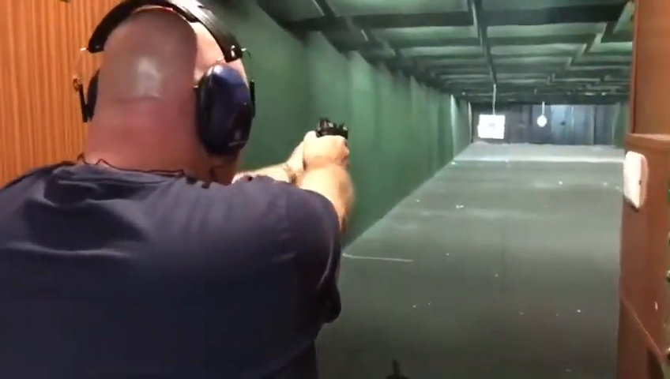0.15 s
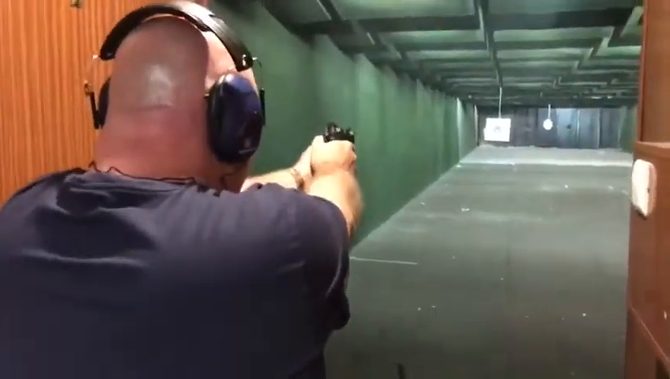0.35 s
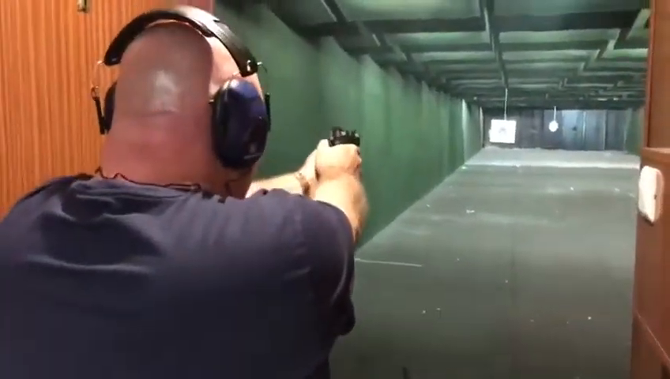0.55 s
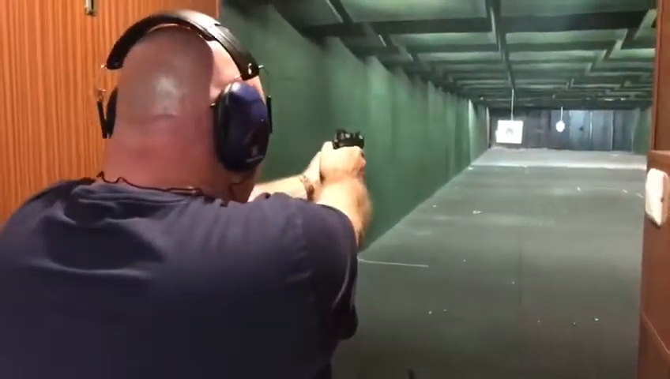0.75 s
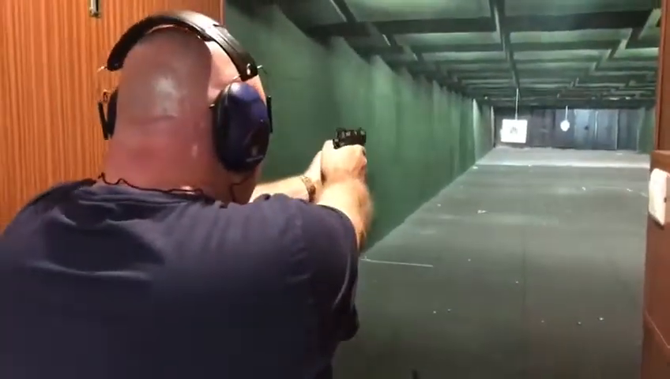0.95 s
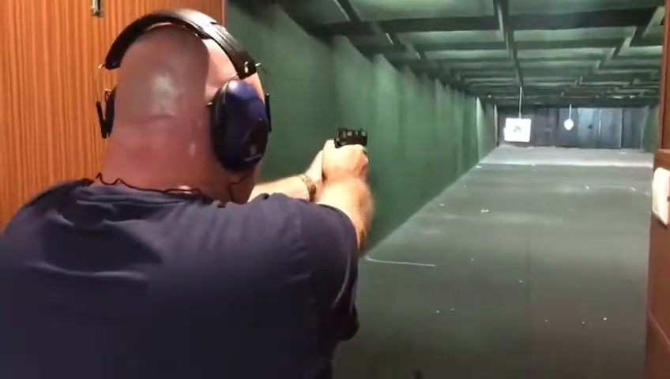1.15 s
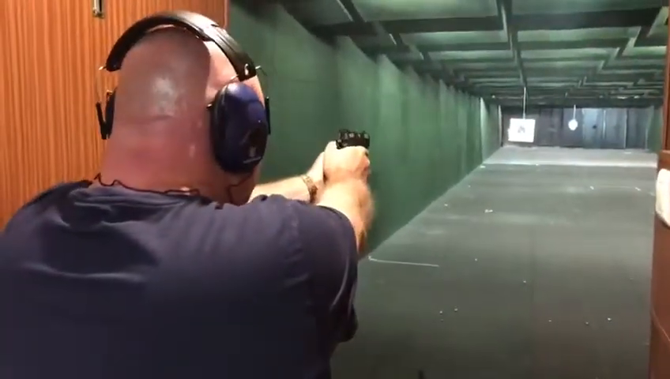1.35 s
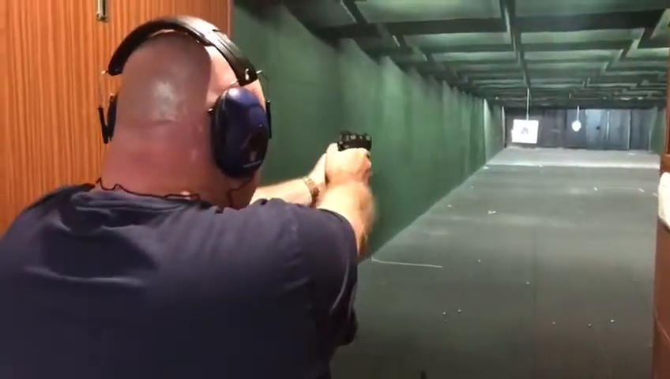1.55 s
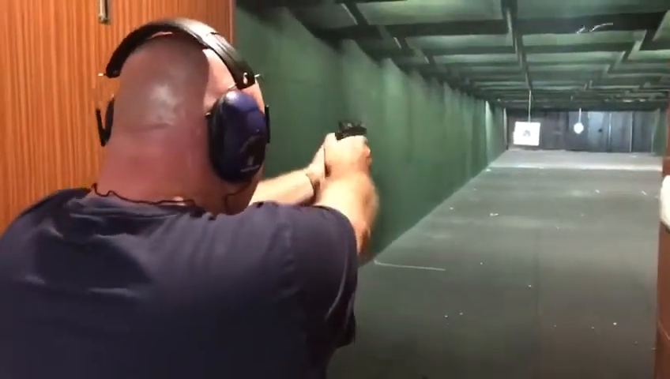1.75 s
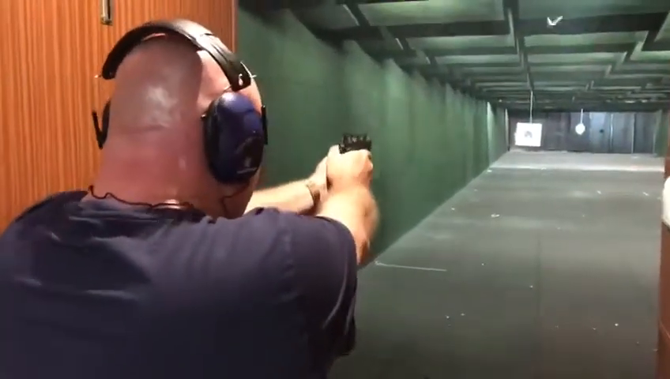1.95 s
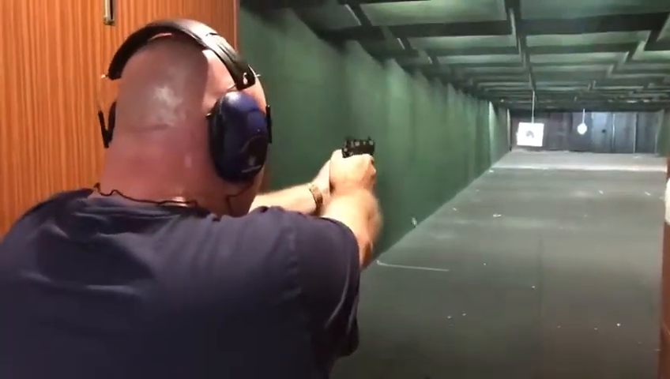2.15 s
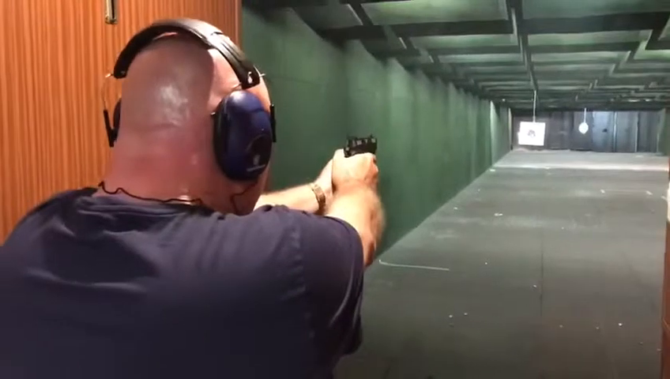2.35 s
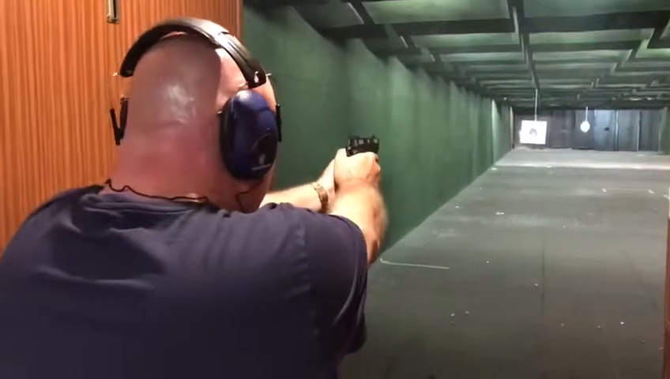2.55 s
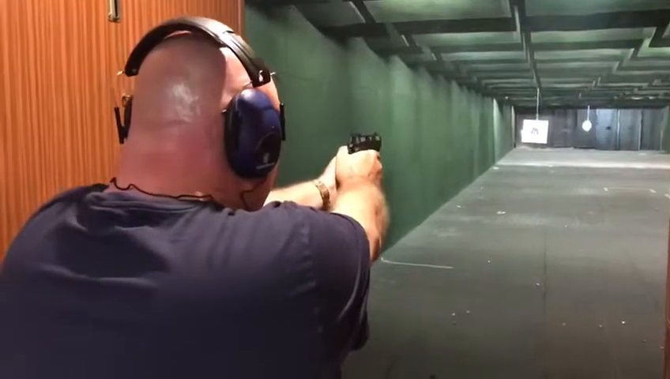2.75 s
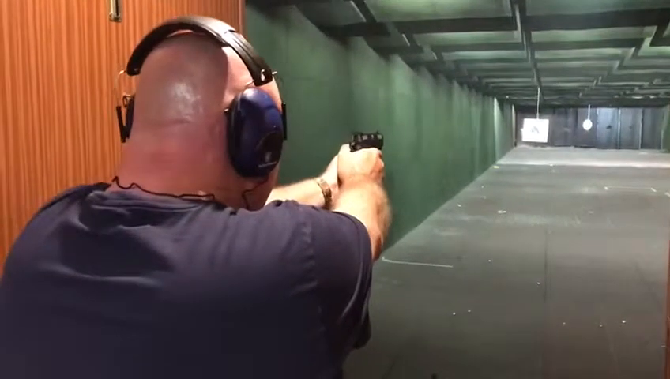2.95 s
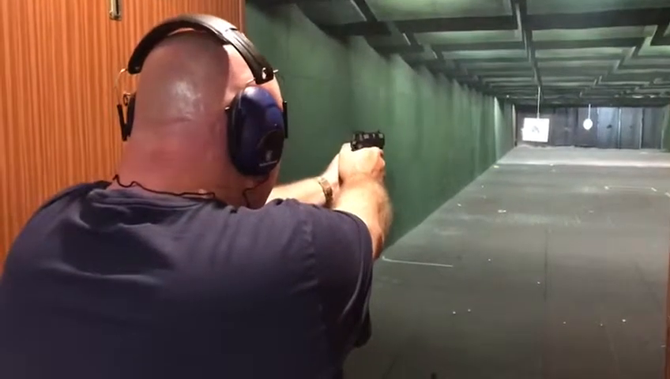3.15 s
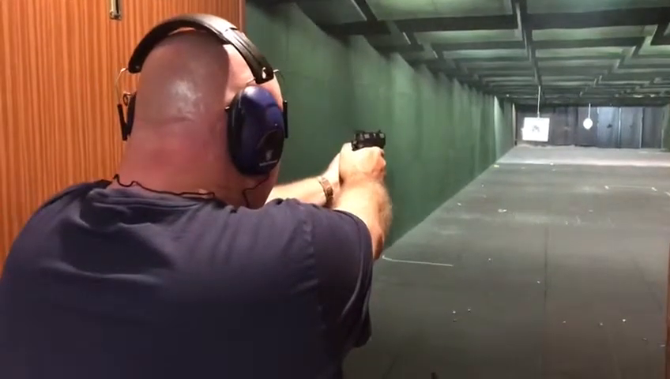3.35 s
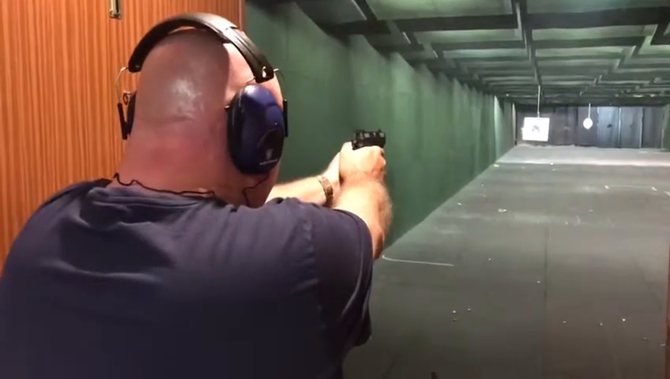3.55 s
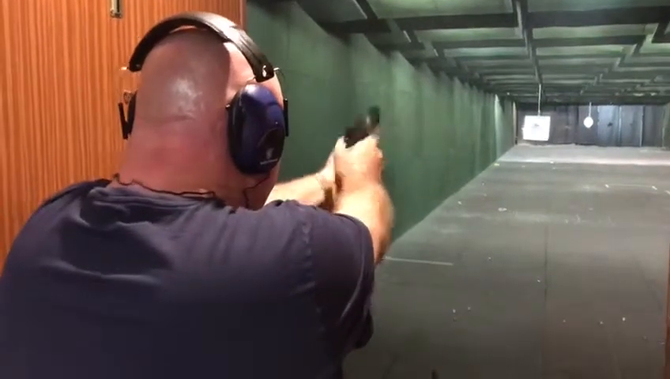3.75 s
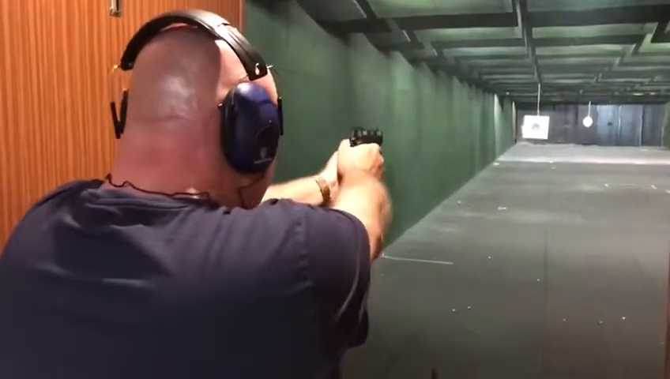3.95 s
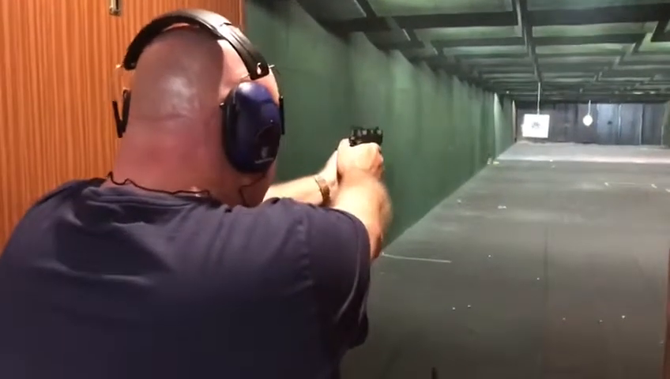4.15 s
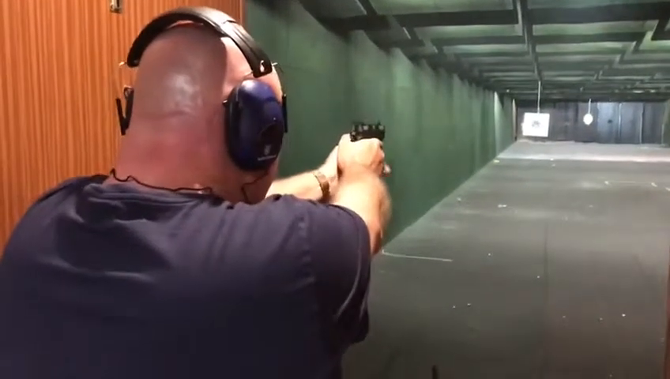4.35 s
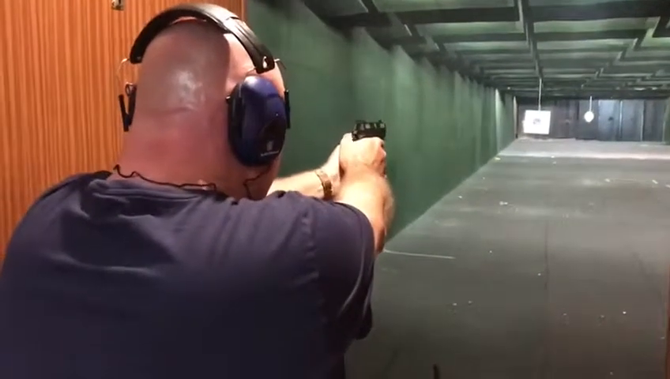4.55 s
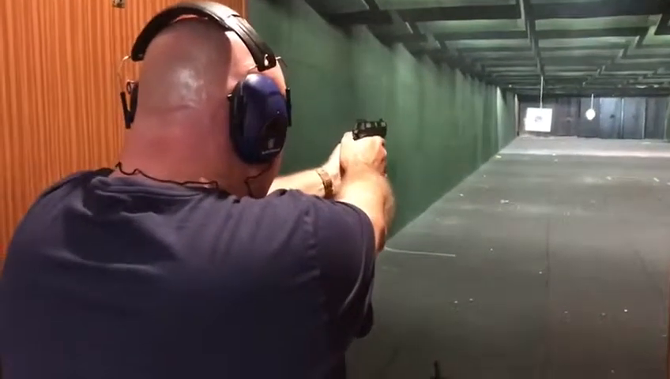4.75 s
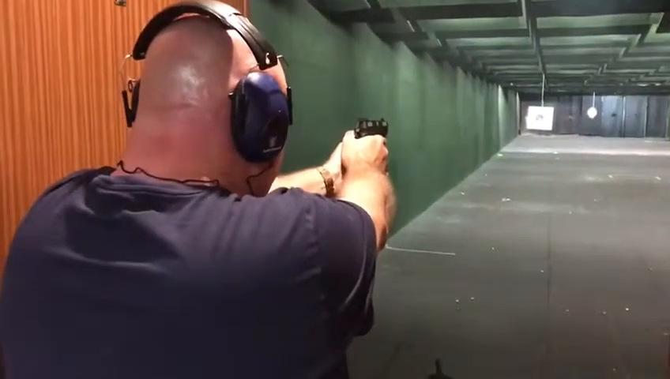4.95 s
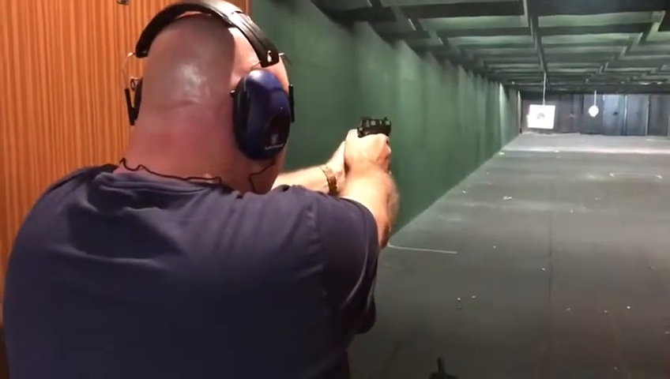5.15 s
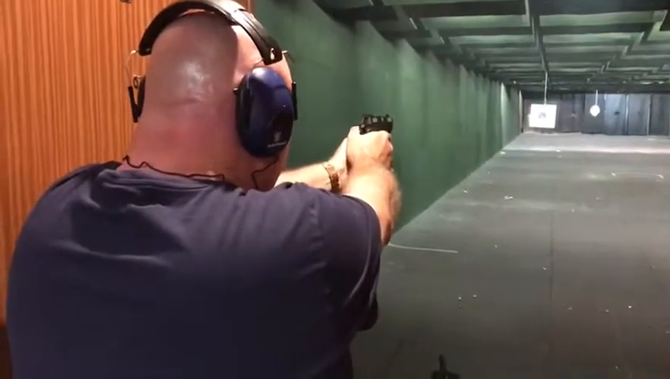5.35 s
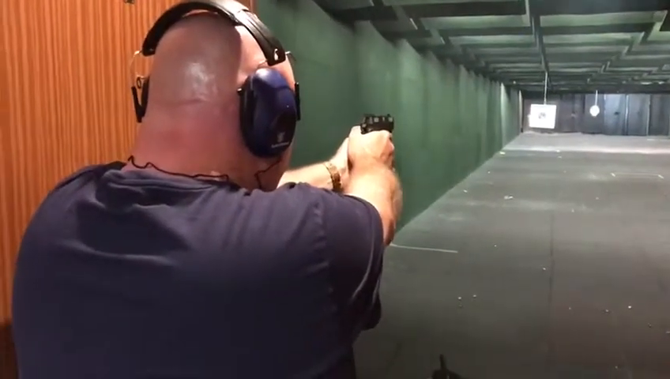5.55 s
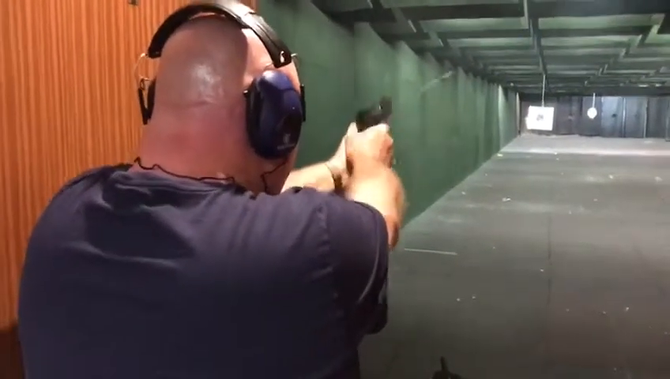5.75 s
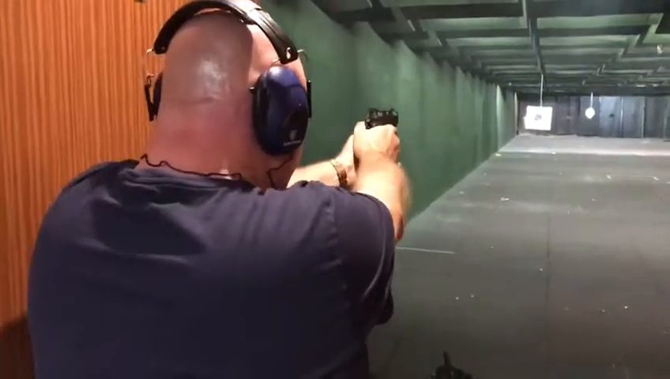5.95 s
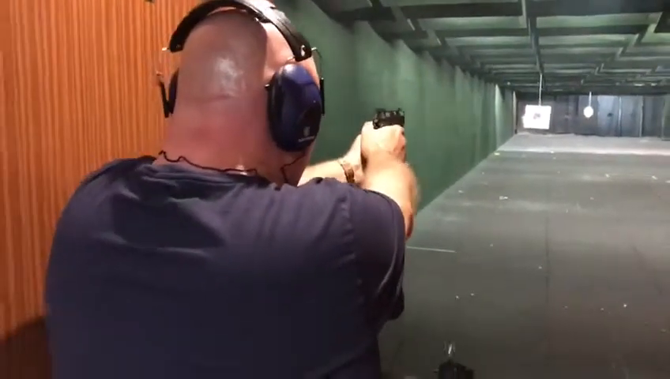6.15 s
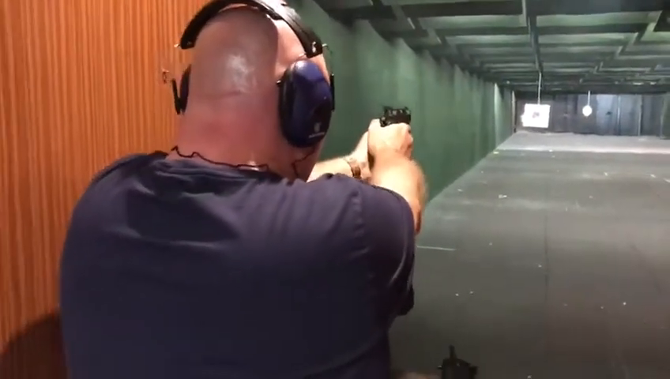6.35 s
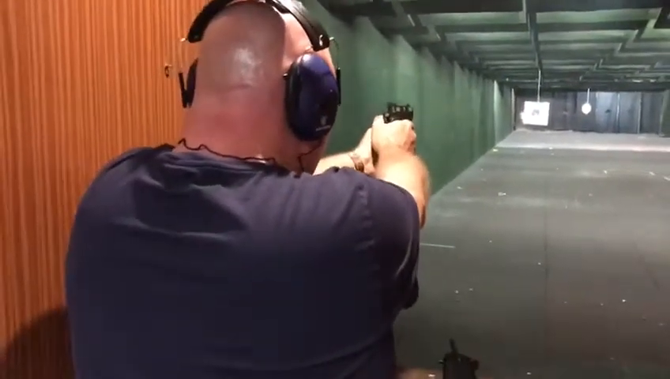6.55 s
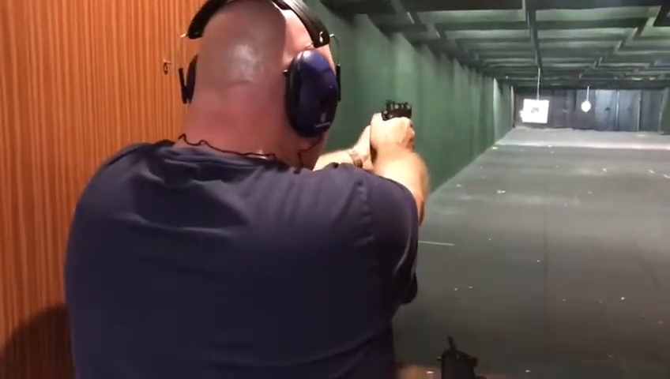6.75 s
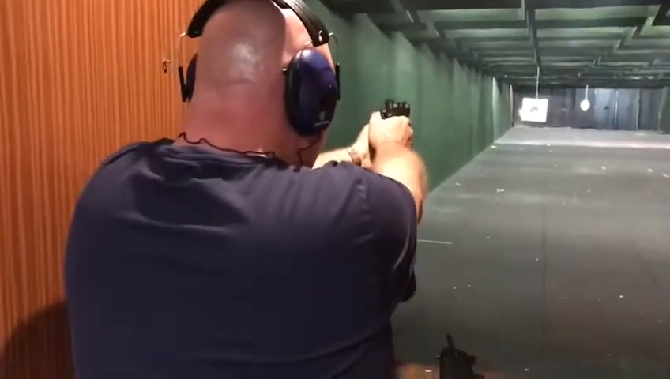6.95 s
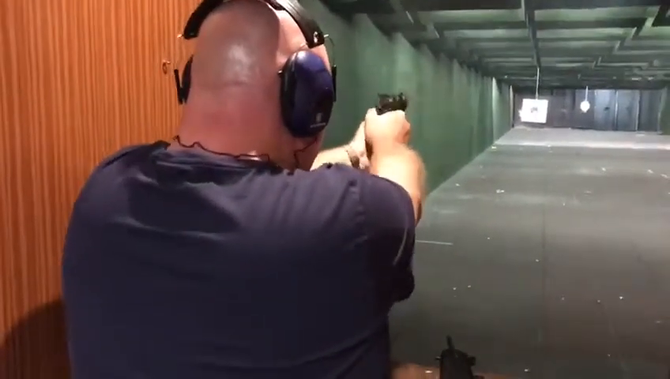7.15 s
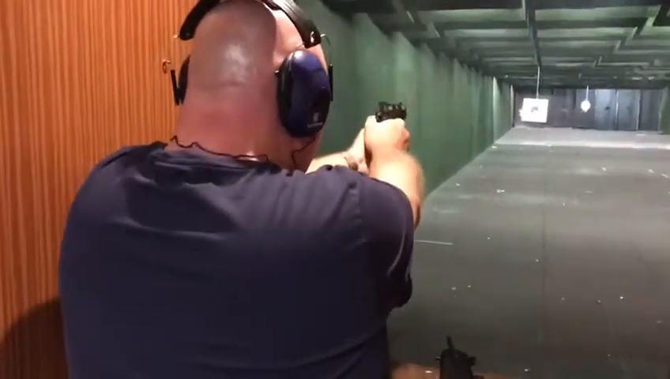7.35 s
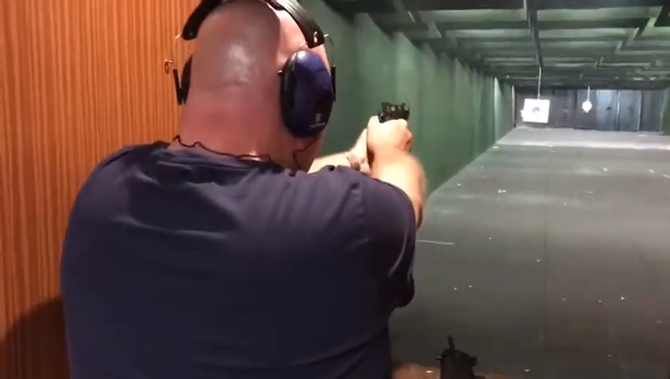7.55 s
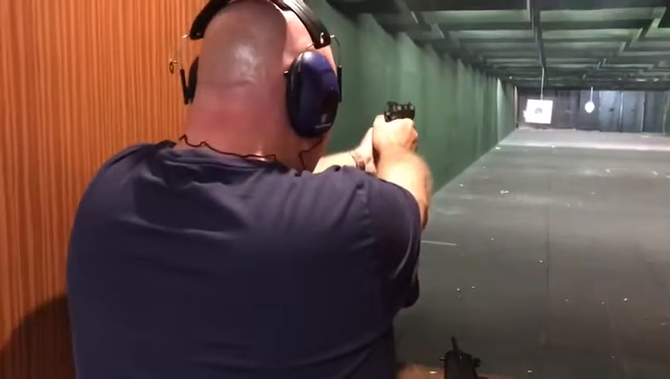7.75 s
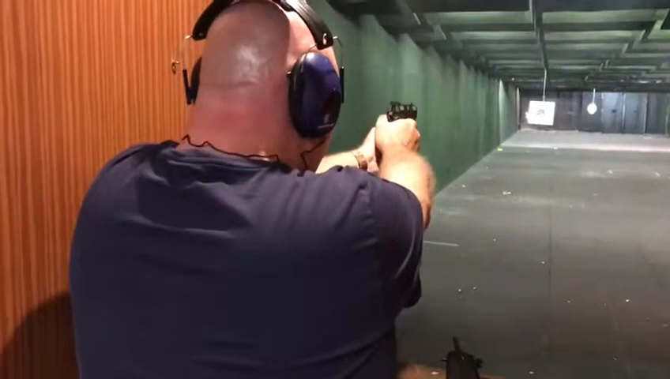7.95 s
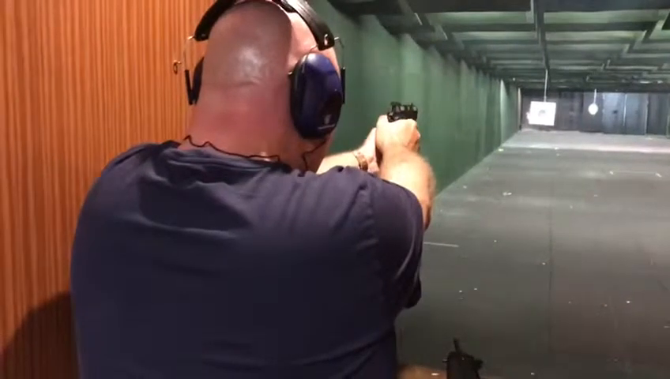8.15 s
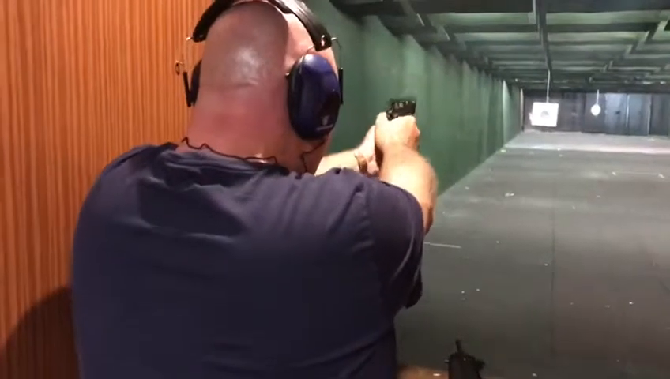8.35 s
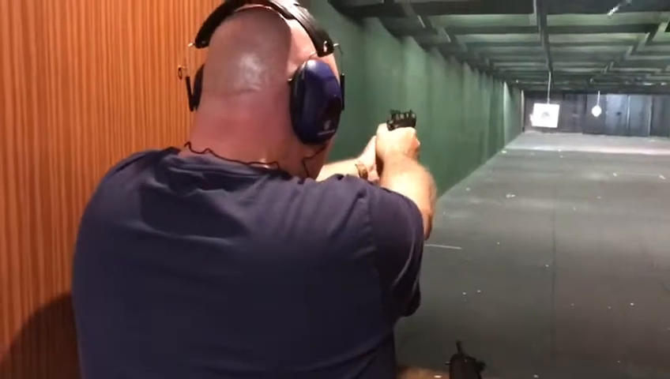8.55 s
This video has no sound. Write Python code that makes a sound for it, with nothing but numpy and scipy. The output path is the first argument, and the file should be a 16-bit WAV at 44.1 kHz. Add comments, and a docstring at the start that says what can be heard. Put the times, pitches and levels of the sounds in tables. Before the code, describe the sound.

Faint ventilation hiss and low duct rumble, with barely audible fan tones, run throughout in a long indoor shooting range. After slight cloth rustles, a pistol fires close by at about 1.6 seconds, then again at 3.7, 5.7, 7.1 and 8.3 seconds. Each shot is a very loud, brief roar that overloads the small microphone and dies quickly in the booth; a softer wash returns from the far end and fades over about a second. Between shots, spent cases and hard parts make much quieter clacks, dull thuds and thin, high brass pings. One stands out at 2.5 seconds, a small bouncing cluster comes around 4.5, and the sharpest clack lands at 5.2. More follow near 6.0, 6.6, 7.3, 7.9, 8.2 and 8.5 seconds. Soft rustles of clothing and grip appear now and then. The last echo is still fading at the end.

```python
"""A pistol fires five shots from a booth in a long indoor range; the blasts overload a small microphone.
The booth roars and dies fast, then the far end of the hall throws each blast back as a slow wash.
Spent cases and hard parts clack and ring on the surfaces they strike; cloth and grip rustle.
Behind them the ventilation hisses, its ducts rumble and a distant fan adds faint tones."""
import sys
import numpy as np
from scipy import signal
from scipy.fft import rfft, irfft
from scipy.io import wavfile
from scipy.ndimage import uniform_filter1d

SR = 44100
rng = np.random.default_rng(int(sys.argv[2]) if len(sys.argv) > 2 else 0)


def store_pcm(level_fs):
    """Save levels as 16-bit WAV."""
    pcm = np.round(np.clip(level_fs, -1, 1) * 32767).astype(np.int16)
    wavfile.write(sys.argv[1], SR, np.atleast_2d(pcm).T)


N = 379701

# shots: (time [s], bass [dB], booth ring [dB], thump [dB], roar hold [s], treble lag [s], steel [dB])
SHOTS = [(1.6433, -6.5, -9, -14, 0.092, 0.009, -51), (3.7449, -1, -11, -4.5, 0.091, 0.0063, -50),
         (5.7478, 0, -16, -2.5, 0.08, 0.00029, -58), (7.0762, -1, -9.5, -10, 0.088, 0.00027, -37),
         (8.2639, -1, -10, -14, 0.09, 0.00013, -49)]
# blast bands: (frequency [Hz], booth level [dB], booth t60 [s], hall level [dB], hall t60 [s])
BLAST_BANDS = [(53, -6.5, 0.34, -58, 0.5), (111, -15.5, 0.18, 2.5, 1.63), (259, -4.5, 0.29, -0.5, 1.05),
               (443, -15, 0.51, -8, 1.18), (715, -7.5, 0.33, -2, 1.1), (1230, -7.5, 0.42, -2.5, 0.95),
               (1884, -14, 0.28, -8, 0.95), (2840, -9, 0.33, -5.5, 0.75), (4230, -9.5, 0.28, -7, 0.58),
               (6780, -14.5, 0.25, -14.5, 0.44), (8250, -13, 0.22, -10.5, 0.31),
               (11930, -14.5, 0.096, -38, 0.073)]
# booth resonances: (frequency [Hz], width [Hz], level [dB])
BOOTH_MODES = [(290, 31, -8), (325, 25, -4), (388, 20, -13.5), (533, 80, -2.5), (657, 120, -2.5),
               (934, 51, -9.5), (980, 30, -10.5), (1290, 17, -1)]
# steel baffle plates: (frequency [Hz], level [dB], t60 [s])
BAFFLE_MODES = [(4165, -7, 1.1), (4178, -12, .9)]
# impacts of cases and hard parts:
# (time [s], clack [dB], thud [dB], tilt [dB/octave], brass [dB], surface pitch [ratio], panel ring [dB])
KNOCKS = [(1.8594, -42.5, -47, 4.5, -64, 1.15, -12), (2.4932, -30.5, -46, 0.5, -40, 1.05, 2.5),
          (3.0808, -53, -30, -6, -77.5, 0.98, -0.5), (3.5341, -64, -39.5, -3.5, -81, 0.73, -5.5),
          (3.9841, -43, -45, 5, -57, 0.92, -3), (4.4336, -33.5, -61, -1.5, -47, 1.27, -0.5),
          (4.4914, -49, -63, 1.5, -67, 1.17, -11), (4.5064, -54, -62, 3, -45.5, 1.2, -10),
          (4.5967, -65, -51, -4, -48.5, 1.01, -3), (4.655, -64, -54, -3, -59, 0.72, -8),
          (4.8375, -84, -56, 11, -46, 0.94, -7.5), (5.0468, -46.5, -32, -6, -58, 0.61, -8),
          (5.2151, -22.5, -30.5, 0.5, -48, 0.85, -5), (5.4154, -54.5, -38, -10.5, -86.5, 0.5, -4),
          (5.5664, -55.5, -40, -1.5, -60, 0.5, -2.5), (5.9763, -43, -48, 1.5, -46, 0.97, 7),
          (6.6114, -32, -51.5, -3.5, -43.5, 1.13, -13), (7.2955, -38, -30, 4, -40, 0.86, 7.5),
          (7.8892, -31.5, -39, 1.5, -61, 1.1, -3), (8.1636, -51.5, -51, 4.5, -58, 1.7, -6),
          (8.2005, -30, -32.5, 0.5, -48, 0.53, -12), (8.4941, -30.5, -27.5, 0.5, -47, 1, 0)]
# hard clack: (frequency [Hz], level [dB])
CLACK_SPECTRUM = [(280, -29.5), (650, -8.5), (1500, 0.5), (3300, -0.5), (5200, -9), (7500, -19.5),
                  (10500, -20)]
# dull thud at surface pitch 1: (frequency [Hz], level [dB])
THUD_SPECTRUM = [(200, -5.5), (400, -3.5), (650, 1), (900, -3.5), (1300, -21), (3300, -32), (10500, -50.5)]
# clatter decay of a pure clack: (frequency [Hz], t60 [s])
CLATTER_DECAY = [(200, 0.26), (800, 0.18), (2500, 0.13), (6000, 0.12), (11000, 0.17)]
# room tail of a knock: (frequency [Hz], t60 [s])
ROOM_DECAY = [(200, 0.56), (1000, 0.66), (3000, 0.4), (6000, 0.55), (11000, 0.44)]
# struck panel at surface pitch 1: (frequency [Hz], level [dB], t60 [s])
PANEL_MODES = [(600, -2, .2), (790, -2, .15), (1070, -3, .1), (1370, -2, .3), (1570, -2, .3),
               (1700, -4, .25), (2170, 0, .2), (2680, -2, .2), (2945, -1, .25), (3290, -3, .18),
               (3680, -3, .15), (4310, -3, .18)]
# rustles of cloth and grip: (time [s], level [dB], t60 [s])
RUSTLES = [(.03, -60, 0.16), (1.11, -63, 0.22), (1.195, -59.5, 0.47), (1.465, -59.5, 0.46), (1.56, -54, 1),
           (2.85, -61.5, 0.22), (3.295, -58, 0.37), (3.69, -55.5, 0.33), (5.0, -69.5, 0.13),
           (5.47, -61, 0.32), (5.54, -55.5, 0.14), (6.5, -61, 0.16), (6.97, -59, 0.075)]
# cloth friction: (frequency [Hz], level [dB])
CLOTH_SPECTRUM = [(300, -36.5), (1000, 0.5), (2500, 0.5), (4500, -1), (8000, -13), (12000, -11)]
# ventilation noise: (frequency [Hz], relative density [dB])
AIR_SPECTRUM = [(12, -52), (20, -22), (92, 0), (111, -3), (124, -22), (167, -21), (218, -23.5), (438, -34),
                (544, -39.5), (692, -38.5), (858, -43.5), (1680, -54), (2200, -53), (2870, -58.5),
                (12200, -71), (15900, -94), (22000, -120)]
# duct resonances: (frequency [Hz], width [Hz], level [dB])
DUCT_MODES = [(64.7, 32, -7), (97, 40, -0.5), (115, 70, 1.5)]
# slow course of the duct rumble: (time [s], level [dB])
RUMBLE_LEVELS = [(0.0, -40), (0.6, -39), (0.84, -47), (1.598, -41), (3.548, -44.5), (4.599, -36),
                 (5.15, -36.5), (5.4, -41.5), (6.598, -38.5), (8.61, -37)]
# fan tones: (frequency [Hz], rms level [dB])
FAN_TONES = [(699.8, -75), (1647, -78.5), (2056, -84.5), (2880, -85), (3704, -91)]

BLAST_GAIN_DB, FRONT_HZ, THUMP_HZ = -7, 505, 63
TREBLE_FADE_DB_PER_S, FADE_CORNER_HZ = 73, 1900
COLLAPSE_DB, COLLAPSE_S = 3, 0.033
RETURN_DELAY_S, RETURN_RISE_S, RETURN_GAIN_DB = 0.22, 0.063, -24.5
BRASS_HZ, BRASS_SPLIT_HZ, BRASS_T60_S = 10950, 25, 0.29
AIR_RMS_DB = -52
DIP_DB, DIP_S = 15, 0.17
SURGE_DB, SURGE_DELAY_S, SURGE_WIDTH_S = -30, 0.503, 0.056
LOW_CUT_HZ, HIGH_CUT_HZ = 38, 12150


def shot(bass_db, ring_db, thump_db, hold_s, lag_s, steel_db):
    """Muzzle blast and its dense reflections: first the booth, then the length of the hall."""
    t = np.arange(1 << 16) / SR
    hz, booth_db, booth_t60_s, hall_db, hall_t60_s = np.transpose(BLAST_BANDS)[:, :, None]
    # the pressure step bounces between the partitions as a short low knock
    front = amp(BLAST_GAIN_DB + 0.5) * swell(t, 0.00016, 0.015) * np.sin(2 * np.pi * FRONT_HZ * t)
    rise_s = np.clip(10 / hz, 0.003, 0.028)  # ten cycles, within limits
    fade_db = TREBLE_FADE_DB_PER_S / (1 + (FADE_CORNER_HZ / hz) ** 2.1) * np.minimum(t, hold_s)
    booth = roar(t - lag_s * (hz > 4000), rise_s, hold_s, booth_t60_s)
    booth *= amp(BLAST_GAIN_DB + booth_db - fade_db)
    hall = amp(RETURN_GAIN_DB + hall_db) * swell(t - RETURN_DELAY_S, RETURN_RISE_S, hall_t60_s)
    bass_gain = amp(bass_db * np.clip(np.log2(400 / hz), 0, 1))
    wash = (bass_gain * np.hypot(booth, hall) * noise_bands(hz[:, 0], len(t))).sum(0)
    booth_response = resonances(BOOTH_MODES, np.fft.rfftfreq(len(t), 1 / SR))
    ring = shaped_noise(booth_response, len(t)) * roar(t, 0.028, hold_s, 0.28)
    # lowest cross mode of the hall
    thump = sine(THUMP_HZ, t) * np.clip(t / hold_s, 0, 1) ** 6.6 * roar(t, 0.01, hold_s + 0.012, 0.01)
    steel = sum(amp(db) * swell(t - RETURN_DELAY_S, 0.015, t60_s) * sine(mode_hz, t)
                for mode_hz, db, t60_s in BAFFLE_MODES)
    return front + wash + amp(ring_db) * ring + amp(thump_db) * thump + amp(steel_db) * steel


def roar(t, rise_s, hold_s, t60_s):
    """Envelope of the blast's roar: builds, holds level briefly, drops abruptly, decays."""
    after_s = np.maximum(t - hold_s, 0)
    build = 1 - np.exp(-np.maximum(t, 0) / rise_s)
    collapse_db = COLLAPSE_DB * (1.5 - np.exp(-after_s / COLLAPSE_S))
    return build * amp(-collapse_db - 60 * after_s / t60_s)


def knock(clack_db, thud_db, tilt_db_per_oct, brass_db, pitch, panel_db):
    """Impact: crack, clatter and room tail; the panel rings and the case sings on close, beating modes."""
    def colour(hz):
        """Gain of a tilted clack over a dull thud."""
        clack = amp(clack_db + lookup(CLACK_SPECTRUM, hz) + tilt_db_per_oct * np.log2(hz / 1500))
        thud = amp(thud_db + lookup(THUD_SPECTRUM, hz / pitch))
        return np.hypot(clack, thud)

    t = np.arange(3 << 13) / SR
    hz = np.array([280, 650, 1000, 1500, 2400, 3600, 5200, 7500, 10500])[:, None]
    crack = amp(-3) * swell(t, 0.000316, 0.011) * (hz > 1200)
    tick = amp(10) * swell(t, 0.00025, 0.014) * (hz > 4000)  # first contact
    length = 0.78 + 0.22 / (1 + amp(thud_db - clack_db))  # thuds die sooner
    clatter = swell(t, 0.53 / hz + 0.0012, length * lookup(CLATTER_DECAY, hz)) * (1 + crack + tick)
    room = amp(-16) * swell(t, 0.0067, lookup(ROOM_DECAY, hz))
    panel = np.zeros(len(t))
    for mode_hz, db, t60_s in PANEL_MODES:
        mode = amp(db) * colour(mode_hz * pitch) * swell(t, 0.0056, t60_s) * sine(mode_hz * pitch, t)
        beat = np.cos(2 * np.pi * (rng.uniform(6.7, 11) * t + rng.random()))
        panel += mode * beat
    case_modes = sum(gain * sine(BRASS_HZ + splits * BRASS_SPLIT_HZ, t)
                     for gain, splits in [(0.54, 0), (0.42, 1), (0.35, -2.3)])
    brass = swell(t, 0.0038, BRASS_T60_S) * case_modes
    impact = (colour(hz) * np.hypot(clatter, room) * noise_bands(hz[:, 0], len(t))).sum(0)
    return impact + amp(panel_db) * panel + amp(brass_db) * brass


def rustle(level_db, t60_s):
    """Cloth or grip scrapes: a soft burst of hiss."""
    t = np.arange(1 << 14) / SR
    colour = amp(lookup(CLOTH_SPECTRUM, np.fft.rfftfreq(len(t), 1 / SR)))
    return amp(level_db) * shaped_noise(colour, len(t)) * swell(t, 0.0037, t60_s)


def ventilation():
    """Steady hiss and roar of moving air, with small drifting patches in its spectrum."""
    frames, hz = N // 256 + 5, np.fft.rfftfreq(1024, 1 / SR)[:, None]
    real, imag, patches = rng.standard_normal((frames, 513, 3)).T
    patches_db = 1.2 * unit_rms(uniform_filter1d(uniform_filter1d(patches, 10, axis=0), 14, axis=1))
    spectra = (real + 1j * imag) * amp(lookup(AIR_SPECTRUM, hz) + patches_db) * (hz > 140)
    hiss = signal.istft(spectra, nperseg=1024, noverlap=768)[1][:N]
    return amp(AIR_RMS_DB) * unit_rms(hiss)


def duct_rumble():
    """Turbulence excites low duct modes; after each shot the level dips, then deep bass swells late."""
    hz = np.fft.rfftfreq(N, 1 / SR)
    colour = amp(-14) * (hz < 160) + resonances(DUCT_MODES, hz)
    colour *= hz ** 3 / (hz ** 3 + 39.0 ** 3)  # roll-off under the lowest mode
    t = np.arange(0, N / SR, 0.005)
    base_db = np.interp(t, *np.transpose(RUMBLE_LEVELS))
    since_shot_s = t - np.array(SHOTS)[:, :1]
    dip_age = np.maximum(since_shot_s, 0) / DIP_S
    dip_db = DIP_DB * (dip_age * np.exp(1 - dip_age) * np.exp(-dip_age ** 4 / 30)).sum(0)
    surge = amp(SURGE_DB) * np.exp(-((since_shot_s - SURGE_DELAY_S) / SURGE_WIDTH_S) ** 2).sum(0)
    envelope = np.hypot(amp(base_db - dip_db), surge)
    return np.interp(np.arange(N) / SR, t, envelope) * shaped_noise(colour, N)


def fan():
    """Distant fan: thin tones with wandering phase."""
    t = np.arange(N) / SR
    hz, db = np.transpose(FAN_TONES)[:, :, None]
    drift_rad = 0.02 * np.cumsum(rng.standard_normal((len(FAN_TONES), N)), axis=1)
    return (np.sqrt(2) * amp(db) * np.sin(2 * np.pi * hz * t + drift_rad)).sum(0)


def amp(db):
    """Decibels to gain."""
    return 10 ** (np.asarray(db) / 20)


def unit_rms(x):
    """Scales to rms 1."""
    return x / np.sqrt(np.mean(x ** 2) + 1e-20)


def lookup(table, hz):
    """Interpolates on a log-frequency axis."""
    table_hz, values = np.transpose(table)
    return np.interp(np.log(hz + 1), np.log(table_hz + 1), values)


def sine(hz, t):
    """Sine with random phase."""
    return np.sin(2 * np.pi * (hz * t + rng.random()))


def swell(t, rise_s, t60_s):
    """Envelope: builds from time zero, decays."""
    t = np.maximum(t, 0)
    return (1 - np.exp(-t / rise_s)) * amp(-60 * t / t60_s)


def resonances(modes, hz):
    """Summed gain of resonance peaks."""
    return sum(amp(db) / (1 + ((hz - mode_hz) / (width_hz / 2)) ** 2) for mode_hz, width_hz, db in modes)


def shaped_noise(colour, size):
    """Noise weighted by a gain per bin, rms 1."""
    return unit_rms(irfft(rfft(rng.standard_normal(size)) * colour, size))


def noise_bands(centres_hz, size):
    """White noise split into overlapping bands, each rms 1."""
    hz = np.fft.rfftfreq(size, 1 / SR)
    index = np.arange(len(centres_hz))
    position = np.interp(np.log(hz + 1), np.log(centres_hz), index)
    share = np.clip(1 - abs(position - index[:, None]), 0, 1)
    share[0] *= hz > centres_hz[0] * 0.75
    bands = irfft(rfft(rng.standard_normal(size)) * np.sqrt(share), size)
    return bands / bands.std(axis=1, keepdims=True)


def scene():
    """All sources at the microphone, mono."""
    mix = ventilation() + duct_rumble() + fan()
    for events, source in [(SHOTS, shot), (KNOCKS, knock), (RUSTLES, rustle)]:
        for time_s, *settings in events:
            sound = source(*settings)
            start = round(time_s * SR)
            mix[start:start + len(sound)] += sound[:N - start]
    return mix[None]


def record(dry):
    """Small microphone: drops the deepest bass, soft-clips the blasts at full scale, limits the band."""
    low_cut = signal.sosfilt(signal.butter(2, LOW_CUT_HZ, "high", fs=SR, output="sos"), dry)
    clipped = low_cut / (1 + low_cut ** 4) ** (1 / 4)
    lowpass = signal.firwin(255, HIGH_CUT_HZ, window=("kaiser", 8), fs=SR)
    return np.clip(signal.oaconvolve(clipped, lowpass[None], "same"), -1, 1)


dry = scene()
out = record(dry)
store_pcm(out)
```